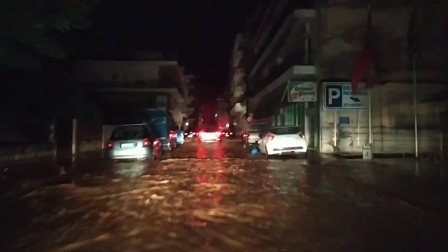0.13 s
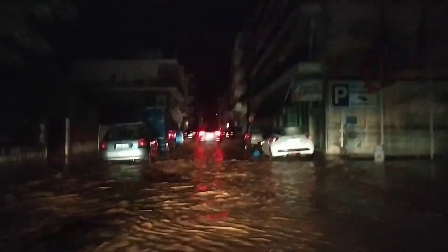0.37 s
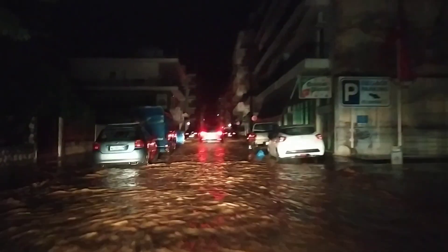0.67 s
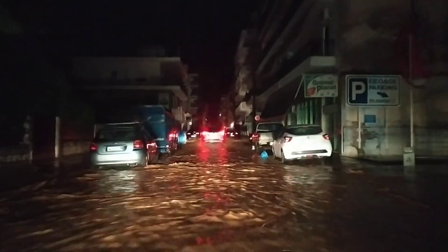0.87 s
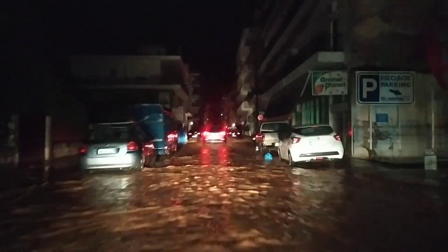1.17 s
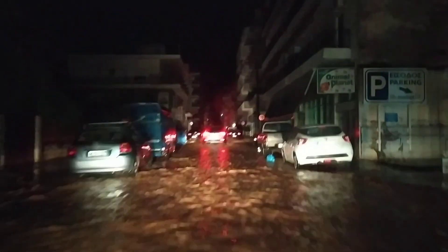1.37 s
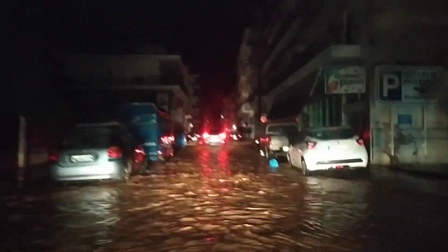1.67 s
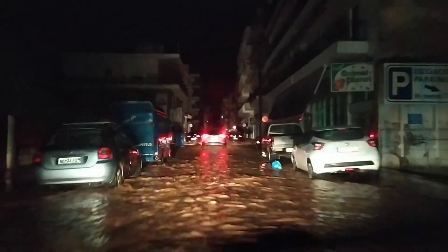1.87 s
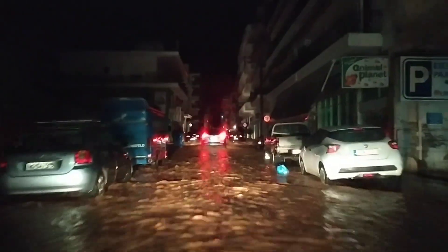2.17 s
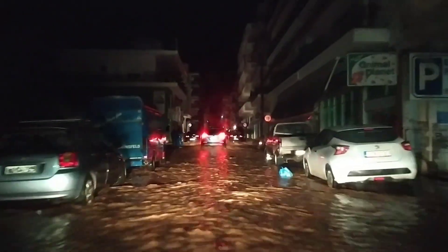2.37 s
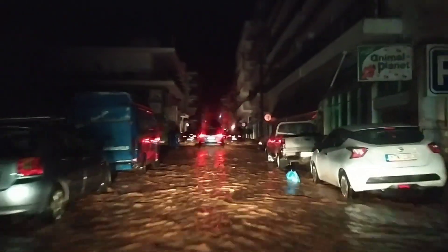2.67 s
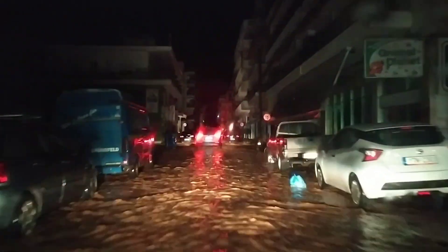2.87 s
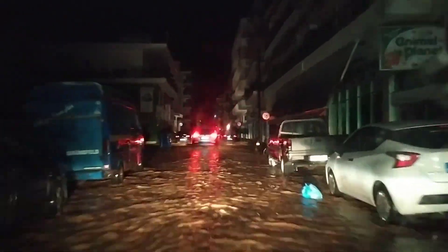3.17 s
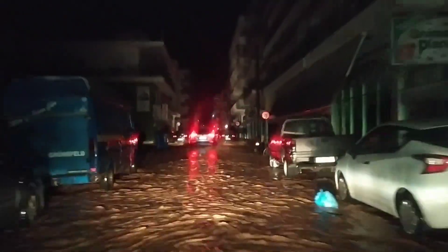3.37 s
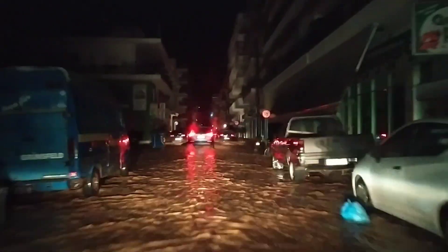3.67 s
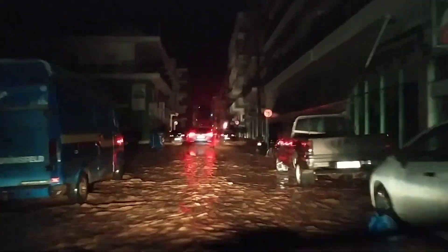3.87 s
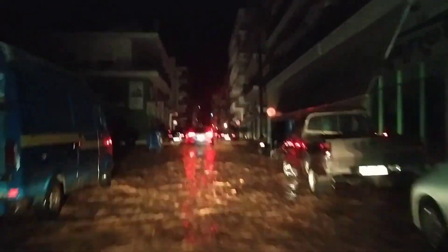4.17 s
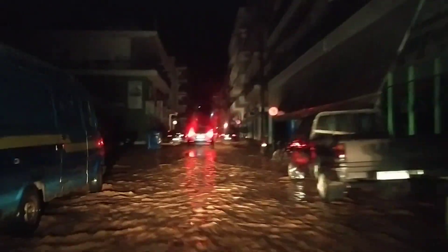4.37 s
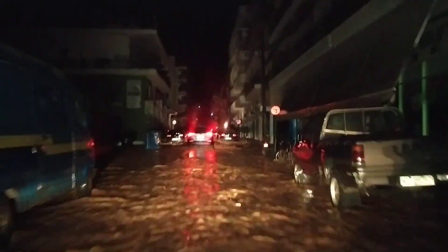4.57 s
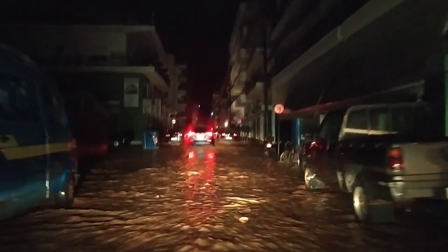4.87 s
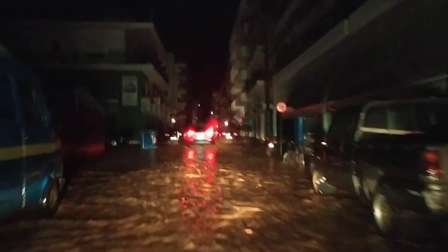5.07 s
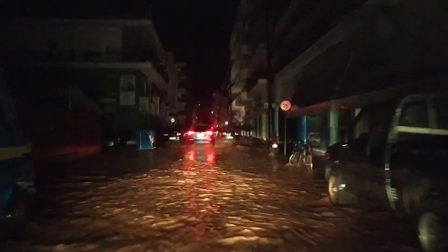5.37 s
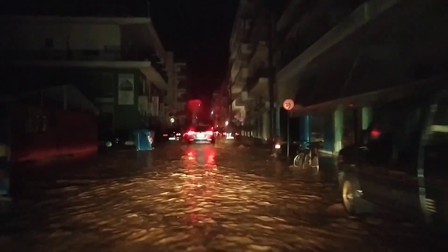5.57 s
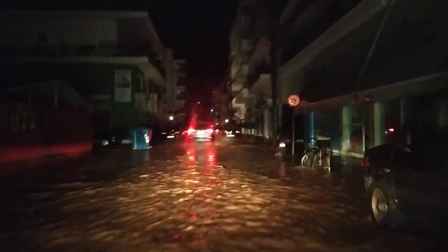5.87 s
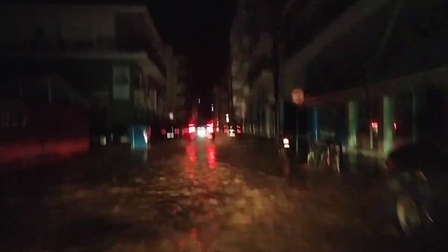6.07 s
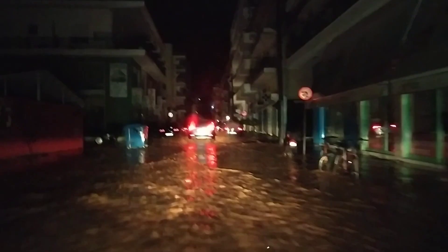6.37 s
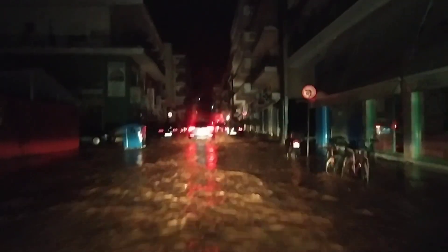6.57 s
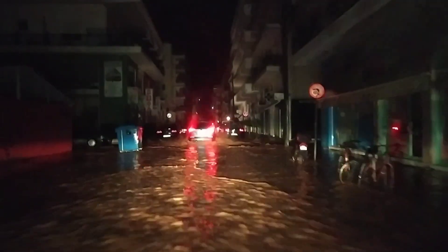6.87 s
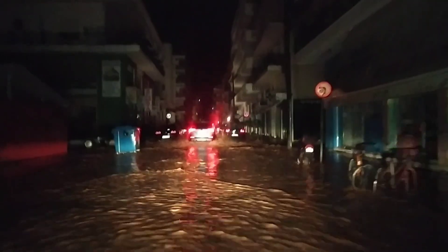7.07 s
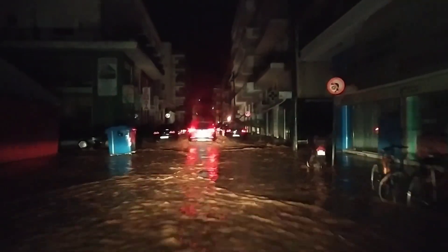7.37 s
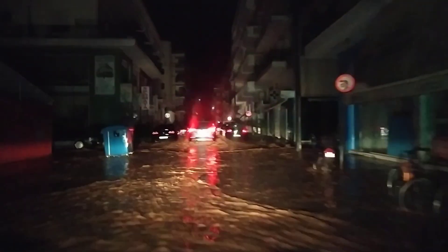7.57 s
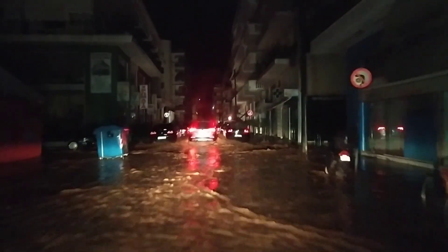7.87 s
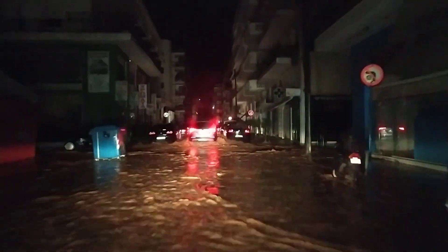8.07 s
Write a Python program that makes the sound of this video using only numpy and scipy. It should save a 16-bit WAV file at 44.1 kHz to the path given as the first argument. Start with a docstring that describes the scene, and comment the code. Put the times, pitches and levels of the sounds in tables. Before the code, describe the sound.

Car cabin in floodwater: deep engine rumble, water washing under the floor, steady wiper thumps and rubber groans, occasional bumps and wave slaps.

```python
"""Inside a car creeping through a flooded street: the engine drones as three wandering multiples of its
firing rate; water drums on the floor pan, washes the sills and sprays, as shaped patchy noise.
The wipers thud off their rest and knock at the top as struck modes, groan as stick-slip tones, swish as noise.
Bumps, slaps, gurgles, drops and pings are single short events. Two microphone ports, the left louder in the bass."""
import sys
import numpy as np
from scipy import signal
from scipy.fft import rfft, irfft, next_fast_len
from scipy.io import wavfile
from scipy.ndimage import uniform_filter1d, map_coordinates

SR = 44100
rng = np.random.default_rng(int(sys.argv[2]) if len(sys.argv) > 2 else 0)


def wav_out(sig):
    """Save sig, one row per channel (or a flat mono array), as 16-bit PCM at SR to the path in sys.argv[1]."""
    wavfile.write(sys.argv[1], SR, np.round(np.clip(np.atleast_2d(sig).T, -1, 1) * 32767).astype(np.int16))


N = 362943


def amp(db):
    """Gain of a level in dB."""
    return 10 ** (np.asarray(db) / 20)


def unit(x):
    """Scaled to rms 1."""
    return x / np.sqrt(np.mean(x ** 2) + 1e-20)


def along(points, hz):
    """(f/Hz, value) points interpolated on a log frequency axis."""
    f, v = np.transpose(points)
    return np.interp(np.log(hz + 1), np.log(f + 1), v)


def curves(rows):
    """One value per sample for each column after the time."""
    s, *cols = np.transpose(rows)
    return [np.interp(np.arange(N) / SR, s, c) for c in cols]


def wobble(rate_hz):
    """Smooth random curve, rate_hz knots a second."""
    knots = rng.standard_normal(int(N * rate_hz / SR) + 4)
    return map_coordinates(knots, [np.arange(N) * rate_hz / SR])


def filtered(x, response):
    """x times a response of frequency."""
    m = next_fast_len(N + 8192)
    return irfft(rfft(x, m) * response(np.fft.rfftfreq(m, 1 / SR)), m)[..., :N]


def add(out, s, sound):
    """Mixes a sound in from time s on."""
    out[..., round(s * SR):][..., :sound.shape[-1]] += sound


TOUCH_S = 0.0094  # soft ends


def span(s, length_s):
    """1 from s for a length, with soft ends."""
    t = np.arange(N) / SR
    return np.clip(np.minimum(t - s, s + length_s - t) / TOUCH_S, 0, 1)


def lumps(rows):
    """Sum of Gaussian swells; rows of t/s of the crest, level/dB, half-width/s (to 1/e)."""
    t = np.arange(N) / SR
    return sum(amp(db) * np.exp(-((t - s) / width_s) ** 2) for s, db, width_s in rows)


def leaned(db, pan_db):
    """Gains of the left and right port, pan_db apart."""
    return amp(db + np.array([[pan_db], [-pan_db]]) / 2)


# likeness of the ports in noise: f/Hz, left-right correlation (-1 to 1)
PORT_LIKENESS = [(40, 0.99), (90, 0.92), (150, 0.94), (260, 0.82), (430, 0.85), (600, 0.32), (700, 0.4),
                 (900, -0.16), (1050, -.1), (1150, -0.42), (1550, -0.43), (1700, -0.039), (2050, 0.16),
                 (2300, 0.25), (2550, -0.018), (9000, 0.0052)]


def rush(spectrum, patchy_db, splashes_per_s=0, splash_db=0):
    """Stereo noise of rms 1 in random time-frequency patches, with decaying splashes on top."""
    z = signal.stft(rng.standard_normal((2, N)), nperseg=512)[2]
    field = uniform_filter1d(rng.standard_normal(z.shape[1:]), size=8, axis=0)
    field = uniform_filter1d(field, size=8, axis=1)
    pair = signal.istft(z * amp(patchy_db * unit(field)), nperseg=512)[1][:, :N]

    starts = (rng.random(N) < splashes_per_s / SR) * rng.exponential(size=N)
    splashes = signal.lfilter([1], [1, -np.exp(-1 / (0.0049 * SR))], starts)
    pair = pair * (1 + amp(splash_db) * splashes)

    def mid_side(hz):
        turn = np.arccos(np.clip(along(PORT_LIKENESS, hz), -1, 1)) / 2
        return amp(along(spectrum, hz)) * [np.cos(turn), np.sin(turn)]

    mid, side = filtered(pair, mid_side)
    return unit(np.array([mid + side, mid - side]))


def ring(modes, t, attack_s):
    """Decaying modes struck once; strengths and pitches vary per blow, the mix per port."""
    hz, db, t60_s = np.transpose(modes)[..., None]
    draw = rng.standard_normal((4, len(modes), 1))
    hz = hz * (1 + .02 * draw[0])
    db = db + 1.2 * draw[1]
    port_db = 1.1 * draw[2:]
    tones = amp(db + port_db - 60 * t / t60_s) * np.sin(2 * np.pi * hz * t)
    return tones.sum(axis=1) * (1 - np.exp(-t / attack_s))


# engine: t/s, firing rate f/Hz, firing tone level/dB, octave level/dB
ENGINE_COURSE = [(0, 61.2, -19.5, -36.5), (.1, 60.74, -32.5, -47), (.2, 56.14, -27.5, -39),
                 (.35, 54.25, -24.5, -36.5), (.9, 54, -29, -41.5), (2, 55.24, -26.5, -38.5),
                 (2.5, 55.46, -30, -41.5), (3.2, 55.9, -28.5, -41.5), (3.7, 54.9, -29.5, -38.5),
                 (4.2, 52.5, -29, -38), (4.5, 51.65, -35.5, -40.5), (4.85, 51, -32, -33.5),
                 (5, 50.75, -43, -38.5), (5.4, 49.4, -68, -43), (5.6, 49.23, -32.5, -46),
                 (6, 49.9, -35, -38), (6.25, 49.68, -43, -43.5), (6.65, 49.24, -33, -42),
                 (6.95, 48.65, -54, -40), (7.2, 49.8, -35, -40.5), (7.5, 49.36, -60, -33.5),
                 (8.23, 48.8, -39, -42)]
THIRD_UNDER_TONE_DB = 14


def engine():
    """Firing tone, octave and faint third multiple, unsteady in rate, level and phase."""
    hz, tone_db, octave_db = curves(ENGINE_COURSE)
    phase = 2 * np.pi * np.cumsum(hz * (1 + 0.0018 * wobble(6.7))) / SR
    tone = amp(tone_db + 0.7 * wobble(3.9)) * np.sin(phase)
    octave = amp(octave_db + 2.6 * wobble(11)) * np.sin(2 * phase + 0.59 * wobble(9))
    third_db = tone_db - THIRD_UNDER_TONE_DB + 2.8 * wobble(8.2)
    third = amp(third_db) * np.sin(3 * phase + 0.85 * wobble(8))
    return np.sqrt(2) * (tone + octave + third)


# water on the car: t/s, floor pan level/dB, wash level/dB, spray level/dB
WATER_COURSE = [(0, -28.5, -47, -64), (.4, -30.5, -47.5, -60.5), (.9, -33, -47.5, -61),
                (1.4, -32, -49, -62.5), (2, -32, -48, -62.5), (2.45, -31.5, -48, -62.5),
                (2.9, -32, -47.5, -62), (3.6, -30.5, -47, -61), (4.4, -31.5, -47.5, -59.5),
                (5.3, -33.5, -47, -60.5), (6.4, -31, -47, -59), (6.9, -32.5, -48, -60),
                (7.3, -32, -47.5, -61.5), (7.7, -31, -46.5, -60), (7.95, -29, -45, -60),
                (8.12, -30.5, -45, -59.5), (8.23, -32.5, -46.5, -60)]
# noise spectra: f/Hz, relative density/dB
SWAY_SPECTRUM = [(8.8, -46), (15, 4), (38, 11), (60, -31), (78, -27), (130, -120)]
PAN_SPECTRUM = [(35, -46), (48, -9), (58, -12), (67, -12), (81, -9.5), (105, -15), (125, -12), (163, -8.5),
                (200, -13), (263, -18), (336, -18.5), (462, -26.5), (560, -36), (700, -32), (910, -73)]
WASH_SPECTRUM = [(260, -18), (430, -5.5), (540, -2), (640, -10), (740, -8), (990, -10), (1470, -17),
                 (2000, -18), (2400, -20), (2900, -26.5), (3600, -33.5), (4700, -59)]
SPRAY_SPECTRUM = [(1650, -35), (2800, -6), (3300, -2.5), (4200, -1), (5200, -5.5), (7000, -9.5),
                  (8600, -8.5), (9600, -8.5), (10600, -12.5), (11900, -24), (12600, -34), (14000, -64)]
SWAY_DB, SWAY_LUMPS_DB = -37, 0.8  # rocking of the body, its swell
SHUDDER_DB = 0.5  # lift of the drumming during a groan


def water():
    """Waves rock the body, drum on the pan, wash the sills, spray; drumming lifts during groans."""
    pan_db, wash_db, spray_db = curves(WATER_COURSE)
    surge = wobble(7)
    shudder_db = SHUDDER_DB * sum(span(s, length_s) for s, length_s, *_ in GROANS)

    sway = amp(SWAY_DB + SWAY_LUMPS_DB * wobble(13.0)) * rush(SWAY_SPECTRUM, patchy_db=-4.5)

    pan_db = pan_db + shudder_db + 0.94 * surge + 0.8 * wobble(2.494)
    pan = amp(pan_db) * rush(PAN_SPECTRUM, patchy_db=1.28)

    wash_noise = rush(WASH_SPECTRUM, patchy_db=1.03, splashes_per_s=60, splash_db=-15.0)
    wash = amp(wash_db + 0.46 * surge) * wash_noise

    spray_noise = rush(SPRAY_SPECTRUM, patchy_db=0.75, splashes_per_s=32, splash_db=-14.5)
    spray = amp(spray_db + 0.23 * surge + 0.46 * wobble(11)) * spray_noise
    return sway + pan + wash + spray


SMACK_T60_S = 0.057


def smack(db, low_hz, high_hz):
    """Band-limited noise burst with a soft attack: wet rubber or loose linkage."""
    t = np.arange(SR // 4) / SR
    burst = (1 - np.exp(-t / 0.0049)) * amp(-60 * t / SMACK_T60_S)
    band = signal.butter(3, [low_hz, high_hz], "band", fs=SR, output="sos")
    return amp(db) * signal.sosfilt(band, burst * rng.standard_normal((2, len(t))))


THUD_PEAK_S, THUD_WIDTH_S, THUD_OVER_COWL_DB = 0.01585, 0.0073, 1
THUD_HZ, THUD_SAG_HZ_PER_S = 262.6, 4700  # pitch at the peak, its fall


def linkage_blow(t):
    """Soft blow as the linkage takes up: a Gaussian tone burst of sagging pitch."""
    late = t - THUD_PEAK_S
    cycles = (THUD_HZ - THUD_SAG_HZ_PER_S * late / 2) * late
    return np.exp(-(late / THUD_WIDTH_S) ** 2) * np.cos(2 * np.pi * cycles)


# wipers leaving rest: t/s, pivot click, cowl thud, low boom, arm knock level/dB
WIPER_STARTS = [(0.2812, -45, -20, -14, -31.5), (1.7073, -44, -19, -12.5, -31),
                (3.133, -46, -24.5, -13, -40), (3.1644, -49, -22.5, -22, -49),
                (4.544, -43, -19.5, -7.5, -31), (5.9706, -46, -19.5, -30, -35),
                (7.3731, -43, -18.5, -12, -33.5)]
# struck modes: f/Hz, level/dB, t60/s
PIVOT_MODES = [(3960, -2.5, 0.011), (4500, -5, .008), (5400, -10, .008)]
FLIP_MODES = [(1650, 3.5, 0.015), (1910, 1.5, 0.017), (2150, -5, 0.018), (2590, -12, 0.013),
              (2920, -11.5, 0.014)]
ARM_MODES = [(493, -4, 0.055), (623, 4.5, 0.055), (721, -3.5, 0.04), (815, -8.5, 0.025),
             (1010, -6.5, 0.029), (1190, -6, 0.021), (1390, -10, 0.03)]
COWL_MODES = [(266.3, 4.5, 0.071), (234, -2, 0.1), (179.4, -8.5, 0.094), (348, -4, 0.049), (440, -14, 0.05)]
BOOM_MODES = [(103.7, 4.5, 0.16), (143, -9, 0.13)]
FLIP_UNDER_KNOCK_DB, START_SMACK_OVER_CLICK_DB = 12, 8.5
COWL_REBOUND_S, COWL_REBOUND_LOSS_DB = .036, 0.6  # linkage thuds the cowl again
BOOM_LAG_S = 0.025


def wiper_starts():
    """Leaving rest: pivot clicks, rubber smacks and flips, linkage thuds the cowl twice, cabin booms."""
    out, t = np.zeros((2, N + SR)), np.arange(SR // 4) / SR
    blow = linkage_blow(t)
    for s, click_db, thud_db, boom_db, knock_db in WIPER_STARTS:
        add(out, s, amp(click_db) * ring(PIVOT_MODES, t, attack_s=0.0005))
        add(out, s, smack(click_db + START_SMACK_OVER_CLICK_DB, low_hz=600, high_hz=4500))
        flip = amp(-FLIP_UNDER_KNOCK_DB) * ring(FLIP_MODES, t, attack_s=0.00091)
        add(out, s + 0.00218, amp(knock_db) * (flip + ring(ARM_MODES, t, attack_s=0.004)))
        add(out, s + 0.00807, amp(thud_db) * ring(COWL_MODES, t, attack_s=0.012))
        add(out, s, amp(thud_db + THUD_OVER_COWL_DB) * blow)
        rebound = amp(thud_db - COWL_REBOUND_LOSS_DB) * ring(COWL_MODES, t, attack_s=0.0056)
        add(out, s + COWL_REBOUND_S, rebound)
        add(out, s + BOOM_LAG_S, amp(boom_db) * ring(BOOM_MODES, t, attack_s=0.046))
    return out[:, :N]


# wipers turning at the top: t/s, arm knock level/dB, arm pitch ratio,
# cowl thud level/dB, smack level/dB, judder level/dB
WIPER_TOPS = [(1.0, -37, 1.04, -27.5, -38, -40), (2.433, -28.5, 0.983, -24, -37, -32),
              (3.85, -22.5, 0.97, -31, -34, -51.5), (5.269, -24.5, 1.08, -26, -30.5, -30.5),
              (6.681, -42, 1.2, -32, -31, -30), (8.112, -31.5, 1.05, -24.5, -31.5, -42)]
TOP_FLIP_UNDER_SMACK_DB, REBOUND_S, REBOUND_LOSS_DB = 9, 0.0355, 11.5
SMACK_LEAD_S = 0.0075  # rubber folds over before the knock
TOP_CLATTER_OVER_KNOCK_DB, CLATTER_LAG_S = 0.6, 0.00197  # loose linkage


def wiper_tops():
    """At the top the rubber smacks over, the arm knocks and rebounds, linkage clatters, cowl thuds."""
    out, t = np.zeros((2, N + SR)), np.arange(SR // 4) / SR
    for s, knock_db, ratio, thud_db, smack_db, _ in WIPER_TOPS:
        arm = [(hz * ratio, db, t60_s) for hz, db, t60_s in ARM_MODES]
        add(out, s, amp(knock_db) * ring(arm, t, attack_s=0.004))
        add(out, s, amp(smack_db - TOP_FLIP_UNDER_SMACK_DB) * ring(FLIP_MODES, t, attack_s=.001))
        add(out, s - SMACK_LEAD_S, smack(smack_db, low_hz=480, high_hz=2380))
        clatter = smack(knock_db + TOP_CLATTER_OVER_KNOCK_DB, low_hz=400, high_hz=1480)
        add(out, s + CLATTER_LAG_S, clatter)
        add(out, s + 0.00483, amp(thud_db) * ring(COWL_MODES, t, attack_s=0.004))
        rebound = amp(knock_db - REBOUND_LOSS_DB) * ring(arm[1:3], t, attack_s=0.0014)
        add(out, s + REBOUND_S, rebound)
    return out[:, :N]


# groans: t/s, length/s, first slip rate f/Hz, last slip rate f/Hz, second multiple level/dB,
# third multiple level/dB, loudest point (0-1 of length), fall from it/dB per length
GROANS = [(0.409, 0.4, 68.4, 84, -26.5, -35, 0.61, 14), (1.8, 0.23, 70.13, 71.4, -36.5, -32.5, 0.9, 10.5),
          (2.068, 0.16, 84.35, 82.9, -33.5, -42, 0.9, 3), (3.204, 0.11, 75.3, 70.2, -30.5, -54, 0.7, 3),
          (4.641, 0.2245, 68.06, 73.8, -27, -32.5, 0.93, 6.5),
          (6.012, 0.19, 85.9, 84, -34.5, -46, 0.43, 4.5), (7.449, 0.34, 76.06, 73.8, -31, -42, 0.6, 4.5)]
# judder noise: f/Hz, relative density/dB
JUDDER_SPECTRUM = [(90, -46), (135, 0), (170, 1.5), (250, -4.5), (340, -13.5), (430, -13), (600, -60.5)]
JUDDER_OVER_SECOND_DB, UPPER_LOSS_DB = -8, 10.5  # loss per multiple above the third
TOP_JUDDER_S = 0.032  # lag and half-width of the shake after the top


def groan():
    """Rubber sticks and slips on the way up: wandering multiples of the slip rate, rough judder."""
    out, rough, t = np.zeros(N), np.zeros(N), np.arange(N) / SR
    for s, length_s, first_hz, last_hz, second_db, third_db, crest, fall_db in GROANS:
        way = np.clip((t - s) / length_s, 0, 1)
        wander = 1 + .02 * wobble(12) + .015 * wobble(45)
        slip_hz = (first_hz + (last_hz - first_hz) * way) * wander
        phase = 2 * np.pi * np.cumsum(slip_hz) / SR
        tones = amp(second_db + 1.8 * wobble(20)) * np.sin(2 * phase)
        for k in (3, 4, 5):
            upper_db = third_db - UPPER_LOSS_DB * (k - 3) + 2.5 * wobble(25)
            tones += amp(upper_db) * np.sin(k * phase)
        shape = span(s, length_s) * amp(-fall_db * np.abs(way - crest))
        out += shape * tones
        rough += shape * amp(second_db + JUDDER_OVER_SECOND_DB)
    rough += lumps([(s + TOP_JUDDER_S, db, TOP_JUDDER_S) for s, *_, db in WIPER_TOPS])
    judder = rough * amp(1.4 * wobble(30)) * rush(JUDDER_SPECTRUM, patchy_db=1.0)
    return np.sqrt(2) * out + judder


# body jolts: t/s, swing level/dB, swing f/Hz, trim rattle level/dB
BODY_JOLTS = [(.005, -20.5, 27, -47), (0.369, -29, 25, -55), (2.87, -27, 27, -55), (3.44, -23.5, 27, -52),
              (4.118, -28, 27.2, -36.5), (4.341, -35, 26.8, -47), (5.387, -25, 27.3, -56),
              (5.961, -25.5, 27, -57), (6.37, -15, 25.6, -23.5), (7.53, -30, 27, -50)]
# trim modes: f/Hz, level/dB, t60/s
TRIM_MODES = [(348, 6, 0.088), (188, 2, 0.11), (274, -1, 0.064), (400, -2.5, 0.065), (517, -8, 0.042)]


def jolts():
    """A wheel meets a bump: the body gives a few deep swings and the trim rattles."""
    out, t = np.zeros((2, N + SR)), np.arange(SR // 2) / SR
    for s, db, hz, rattle_db in BODY_JOLTS:
        swing = np.exp(-((t - .045) / 0.041) ** 2) * -np.sin(2 * np.pi * hz * t)
        add(out, s, amp(db) * swing * np.clip(t / 0.0028, 0, 1))
        add(out, s + 0.0102, amp(rattle_db) * ring(TRIM_MODES, t, attack_s=0.0026))
    return out[:, :N]


# waves slapping the sills: t/s, level/dB, ring f/Hz
SILL_SLAPS = [(1.047, -39, 610), (1.622, -42, 530), (4.093, -48, 455), (4.441, -39, 486), (4.684, -38, 557),
              (5.219, -38, 434.1), (7.894, -40, 448), (7.93, -35, 448), (7.958, -36, 455),
              (7.999, -42, 620), (8.021, -38, 550), (8.065, -34, 700)]


def slaps():
    """A wave crest hits sheet metal: a short hollow ring with two overtones."""
    out, t = np.zeros((2, N + SR)), np.arange(SR // 8) / SR
    for s, db, hz in SILL_SLAPS:
        modes = [(hz, 0, .04), (1.75 * hz, -6, .03), (3.6 * hz, -12, .02)]
        add(out, s, amp(db) * ring(modes, t, attack_s=0.0019))
    return out[:, :N]


# surges in the wheel arches: t/s of the crest, level/dB, half-width/s
ARCH_SURGES = [(0.415, -39, 0.024), (0.64, -49, 0.012), (1.002, -45, 0.021), (2.44, -55.5, .04),
               (3.153, -42, 0.023), (4.685, -45, .025), (5.233, -48, .015), (5.312, -45.5, 0.043),
               (6.498, -48, .03), (6.62, -46.5, .04), (6.707, -45, 0.03), (6.95, -45, 0.018),
               (7.504, -46, 0.034), (7.932, -39.5, 0.035), (8.023, -40.5, .022), (8.11, -44, 0.037)]
# arch noise: f/Hz, relative density/dB
ARCH_SPECTRUM = [(200, -34), (300, 1.5), (450, 0.5), (650, -5.5), (850, -7.5), (1150, -15), (1500, -22),
                 (2200, -47.5)]
GURGLES_PER_S, GURGLE_HZ, GURGLE_DB = 60, 520, -51.5  # pitch and level: reference of the scatter


def slosh():
    """Water surges through the wheel arches over a scatter of gurgles of rising pitch."""
    surges = lumps(ARCH_SURGES) * amp(3.4 * wobble(40)) * rush(ARCH_SPECTRUM, patchy_db=0.5)
    out, life = np.zeros((2, N + SR)), np.arange(SR // 16) / SR
    for when, pitch, size, side in rng.random((int(GURGLES_PER_S * N / SR), 4)):
        hz = GURGLE_HZ * 6 ** (pitch - .35)
        cycles = hz * life
        tone = np.sin(2 * np.pi * cycles * (1 + 0.0139 * cycles))
        bubble = tone * (1 - np.exp(-cycles / 1.7)) * np.exp(-cycles / 4.0)
        db = GURGLE_DB - 2.3 * np.log(1 - size) - 7 * np.log2(hz / GURGLE_HZ)
        add(out, when * N / SR, leaned(db, 9.4 * (side - .5)) * bubble)
    return out[:, :N] + surges


# drops cracking on the glass, and the wide snap of the loud ping at 3.70 s: t/s, level/dB, left-right/dB
GLASS_DROPS = [(0.0915, -49, 5), (0.6055, -47, 0), (3.439, -43.5, 3), (3.6391, -51.5, 1), (3.702, -48, -6),
               (3.8019, -55, -2), (5.579, -47, -2), (6.3949, -49, 1), (6.7875, -51.5, -2)]


def drops():
    """A sharp wide noise crack, then a faint longer spatter."""
    out, t = np.zeros((2, N + SR)), np.arange(SR // 20) / SR
    band = signal.butter(2, [5000, 11800], "band", fs=SR)
    fade = amp(-60 * t / 0.0088) + amp(-4.5 - 60 * t / 0.099)
    for s, db, pan_db in GLASS_DROPS:
        crack = signal.lfilter(*band, rng.standard_normal((2, len(t))) * fade)
        add(out, s, leaned(db, pan_db) * crack)
    return out[:, :N]


# narrow pings close to the right port: t/s, level/dB, left-right/dB
RIGHT_PINGS = [(0.155, -52, -11), (0.4733, -56, -10.0), (0.7209, -45.5, -15), (0.8076, -50, -7.0),
               (0.9842, -49, -8.0), (1.1473, -51, -3.5), (1.2382, -55, -5.0), (1.4085, -48, -11),
               (1.5498, -47.5, -12), (1.6407, -54, -8.5), (1.8287, -47.5, -11), (2.4369, -51, -10),
               (2.794, -61, -14), (2.8719, -60, -5.0), (3.2909, -47, -10), (3.702, -40, -14),
               (4.3234, -53, -5.0), (4.7584, -57, -6), (6.526, -53, -5), (6.6035, -57, -4.5)]
PING_HZ, PING_SPREAD_HZ = 9420, 280


def pings():
    """Each ping is a cluster of six close high tones, quickly gone."""
    out, t = np.zeros((2, N + SR)), np.arange(SR // 20) / SR
    fade = (1 - np.exp(-t / 0.0014)) * amp(-60 * t / 0.029)
    for s, db, pan_db in RIGHT_PINGS:
        hz = rng.normal(PING_HZ, PING_SPREAD_HZ, (6, 1))
        cluster = np.sin(2 * np.pi * (hz * t + rng.random((6, 1)))).sum(axis=0)
        early_peak = np.abs(cluster[:SR // 150]).max()
        add(out, s, leaned(db, pan_db) * cluster * fade / early_peak)
    return out[:, :N]


# water flung off the blades: t/s of the crest, level/dB, half-width/s
BLADE_THROWS = [(0.024, -61.5, 0.12), (0.497, -59, 0.044), (0.623, -63, 0.077), (1.925, -59.5, 0.054),
                (3.336, -62.5, 0.084), (4.752, -60.5, 0.048), (6.19, -63.5, 0.055), (7.574, -65, 0.071)]
# flung water noise: f/Hz, relative density/dB
FLUNG_SPECTRUM = [(3000, -18), (4000, -6.5), (7500, -11), (8600, -8.5), (9400, -4), (10300, -11),
                  (11500, -16), (13000, -25)]


def swish():
    """Water flung off the blades: short hisses, stronger at the right port."""
    hiss = rush(FLUNG_SPECTRUM, patchy_db=3.5, splashes_per_s=300, splash_db=-11.5)
    return lumps(BLADE_THROWS) * amp([[-5], [3]]) * hiss


# port balance: f/Hz, left-right/dB
PORT_BALANCE = [(60, 4.5), (110, 5), (200, 6.5), (350, 5.5), (640, 4), (1150, 4.0), (2070, 5), (3740, 0),
                (6760, -0.5), (12200, -3.5)]
# port lag: f/Hz, left port trails by phase/rad
PORT_LAG = [(40, .14), (70, 0.2), (170, 0.098), (340, 0.3), (520, 0.31), (700, 0.063)]


def scene():
    """Cabin sounds pass the ports' balance and lag; drops, pings and swish bypass them."""
    cabin = engine() + water() + wiper_starts() + wiper_tops() + groan() + jolts() + slaps() + slosh()

    def ports(hz):
        gain = amp(np.outer([.5, -.5], along(PORT_BALANCE, hz)))
        return gain * np.exp(np.outer([-.5j, .5j], along(PORT_LAG, hz)))

    return filtered(cabin, ports) + drops() + pings() + swish()


TOP_HZ = 12800


def record(dry):
    """Nothing is kept above the band limit."""
    return filtered(dry, lambda hz: hz < TOP_HZ)


dry = scene()
out = record(dry)
wav_out(out)
```